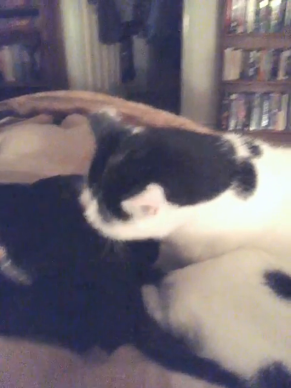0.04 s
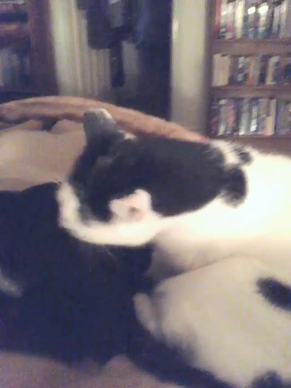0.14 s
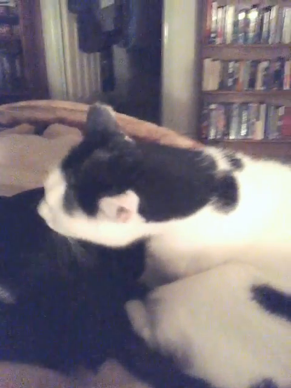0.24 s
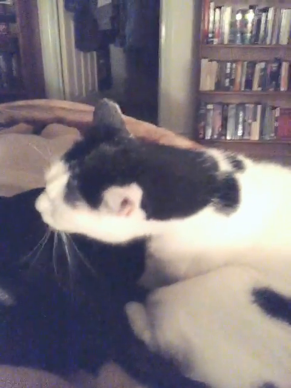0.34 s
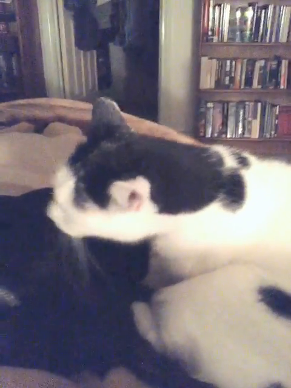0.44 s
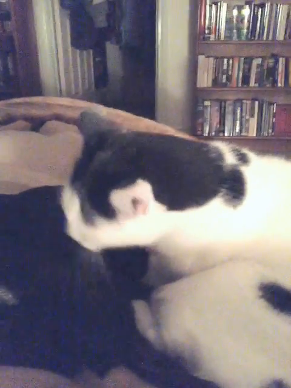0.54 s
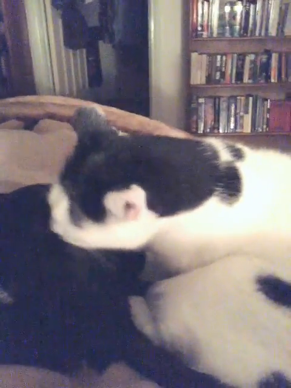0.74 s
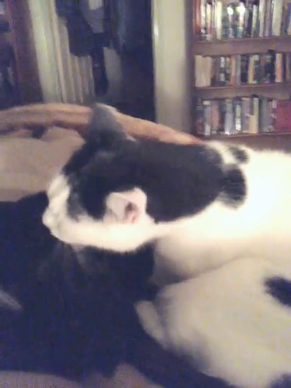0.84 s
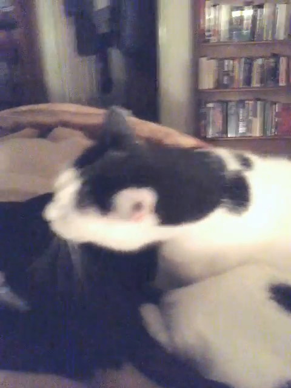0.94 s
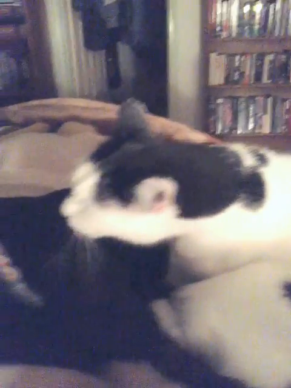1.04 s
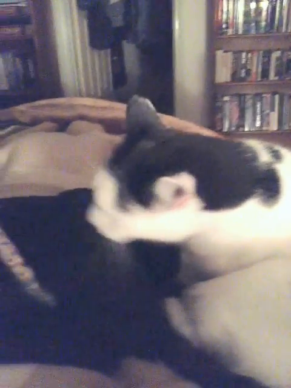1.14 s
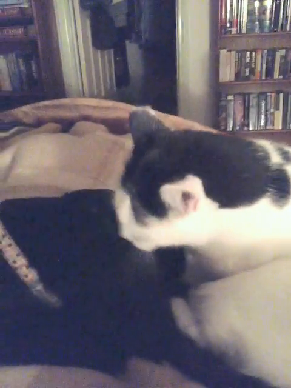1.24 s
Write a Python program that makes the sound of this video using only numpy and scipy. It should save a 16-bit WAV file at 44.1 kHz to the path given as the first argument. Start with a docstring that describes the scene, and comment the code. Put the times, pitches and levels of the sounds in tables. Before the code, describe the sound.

Close handling noise on a hand-held camera in a quiet, echoless room. Soft bumps come first, then dry irregular clicks and a heavier thump, followed by lighter ticks and a last cluster of thuds over faint hiss.

```python
"""Close on a hand-held camera in a quiet, echoless room where one cat grooms another, unheard.
Faint rumble and hiss run throughout. Soft bumps open, then dry ticks join: small pressure steps, most
likely from the grip on the housing, which the microphone's bass cut turns into clicks and low wobbles.
The sharpest tick lands at 0.37 s, the heaviest bump and a tiny creak near 0.44 s. Lighter ticks and
bumps follow, and a last cluster of thuds near 1.2 s trails off in two faint ticks."""
import sys
import numpy as np
from scipy import signal
from scipy.fft import rfft, irfft
from scipy.io import wavfile
from scipy.ndimage import uniform_filter1d

SR = 44100
rng = np.random.default_rng(int(sys.argv[2]) if len(sys.argv) > 2 else 0)


def store_wav(level_fs):
    """Save 16-bit WAV to argv[1]."""
    pcm = np.round(np.clip(np.atleast_2d(level_fs), -1, 1) * 32767)
    wavfile.write(sys.argv[1], SR, pcm.T.astype(np.int16))


N = 57330

# The bed of rumble and hiss, ahead of the microphone.
# Each row: frequency in Hz, level in dB relative to BED_DB.
BED_SHAPE = [(30, 27), (60, 40.5), (120, 17), (200, 13), (350, 6), (700, 3), (1500, 0), (4000, -2.5),
             (8000, -4), (10000, -4.5), (12500, -9.5), (15500, -10.5)]
# Dull pushes of the hand.
# Each row: time in seconds, step size in dB, bandwidth in Hz, direction (+1 push, -1 pull).
HAND_BUMPS = [(0.03, -32.5, 125, 1), (.0653, -29.5, 122, 1), (0.165, -27.5, 100, 1),
              (0.1854, -26.5, 120, 1), (0.1999, -31, 135, -1), (0.4106, -49, 320, 1),
              (0.4436, -25.5, 665, -1), (0.4459, -15, 268, -1), (0.4479, -18, 230, -1),
              (.745, -32, 139, -1), (0.7618, -36, 161, -1), (.775, -31, 125, 1), (.848, -33, 166, -1),
              (0.9311, -48.5, 423, 1), (0.9467, -45, 270, 1), (1.1712, -26.5, 123, 1),
              (1.1961, -22.5, 118, -1), (1.215, -31.5, 140, 1)]
# Sharp slips of the housing.
# Each row: start in seconds, step size in dB, treble corner in Hz, direction (+1 push, -1 pull).
HOUSING_TICKS = [(.23112, -25.5, 2200, 1), (.23182, -22.8, 11000, 1), (.3698, -15.3, 16000, 1),
                 (.4363, -22.7, 15000, 1), (.4881, -24.3, 16000, 1), (.5634, -27.3, 15000, 1),
                 (.6817, -37, 9000, 1), (.8161, -43.5, 900, 1), (.8180, -45, 6000, 1),
                 (.8695, -54, 3500, 1), (1.0158, -31.5, 2800, -1), (1.0583, -54, 5000, -1),
                 (1.0687, -48, 10000, 1), (1.0745, -35.3, 13000, 1), (1.1006, -48, 7000, 1),
                 (1.2444, -48, 8000, 1), (1.2641, -52, 5000, 1)]
# The microphone's two bass-cut stages. Each row: corner in Hz, resonance as Q.
BASS_CUT_STAGES = [(160, 1.554), (266, 0.53)]
# The microphone's colour, with a notch in the treble. Each row: frequency in Hz, gain in dB.
MIC_COLOUR = [(200, 4.5), (1000, -0.18), (3000, -1.56), (6000, -2), (8000, -5), (9800, -11.5), (12000, 0.5),
              (15000, 7), (16500, -8)]

BED_DB, HISS_TOP_HZ, MIC_TOP_HZ = -66, 15900, 16700
CREAK_START_S, CREAK_LENGTH_S, CREAK_HZ, CREAK_DB = .4385, 0.014, 690, -54.5
# Layers are mixed as spectra on these frequencies, at twice the scene's length to leave room for tails.
BINS_HZ = np.maximum(np.arange(N + 1), .5) * SR / (2 * N)


def undb(db):
    """Decibels to gain."""
    return 10 ** (np.asarray(db) / 20)


def eq_curve(points):
    """Gain at each frequency from (Hz, dB) points joined on a log axis."""
    hz, db = np.array(points).T
    return undb(np.interp(np.log(np.maximum(BINS_HZ, 1)), np.log(hz), db))


def rumble_and_hiss():
    """Spectrum of the steady bed: low handling rumble under an even hiss."""
    noise = rfft(rng.standard_normal(2 * N))
    return noise * undb(BED_DB) * eq_curve(BED_SHAPE) * (BINS_HZ < HISS_TOP_HZ)


def pressure_step(time_s, db, direction):
    """Spectrum of a sudden jump in pressure, the raw hit behind every bump and tick."""
    j_omega = 2j * np.pi * BINS_HZ
    delay = np.exp(-j_omega * time_s)
    return np.sign(direction) * undb(db) * SR / j_omega * delay


def hand_bumps():
    """Cushioned pushes: each step is rounded over milliseconds, leaving only a thud."""
    return sum(pressure_step(time_s, db, direction) * np.exp(-(BINS_HZ / bandwidth_hz) ** 2)
               for time_s, db, bandwidth_hz, direction in HAND_BUMPS)


def housing_ticks():
    """Abrupt slips: each step rises within a fraction of a millisecond, so the attack stays crisp."""
    return sum(pressure_step(start_s, db, direction) / (1 + 1j * BINS_HZ / corner_hz) ** 2
               for start_s, db, corner_hz, direction in HOUSING_TICKS)


def grip_creak():
    """The grip slides: about ten cycles of stick and slip, voiced as a tone that swells and stops."""
    t = np.arange(N) / SR - CREAK_START_S
    swell = np.sin(np.pi * np.clip(t / CREAK_LENGTH_S, 0, 1))
    tone = np.sin(2 * np.pi * CREAK_HZ * t)
    return rfft(undb(CREAK_DB) * swell * tone, 2 * N)


def bass_cut():
    """Resonant high-pass: a step swings back and rings for about two cycles."""
    s = 1j * BINS_HZ
    stages = [s * s / (s * s + s * hz / q + hz * hz) for hz, q in BASS_CUT_STAGES]
    return np.prod(stages, axis=0)


def minimum_phase(gain):
    """Turn a gain curve into a filter that never rings ahead of a hit."""
    cepstrum = irfft(np.log(gain))
    half = len(cepstrum) // 2
    cepstrum[1:half] *= 2
    cepstrum[half + 1:] = 0
    return np.exp(rfft(cepstrum))


def scene():
    """Bed, bumps, ticks and creak, mixed in mono through the bass cut."""
    mix = rumble_and_hiss() + hand_bumps() + housing_ticks() + grip_creak()
    return irfft(mix * bass_cut())[None, :N]


def record(dry):
    """Microphone colour, then a steep cut at the top."""
    colour = minimum_phase(eq_curve(MIC_COLOUR))
    coloured = irfft(rfft(dry, 2 * N) * colour)[:, :N]
    top_cut = signal.ellip(10, .2, 70, MIC_TOP_HZ, fs=SR, output="sos")
    return signal.sosfilt(top_cut, coloured)


dry = scene()
out = record(dry)
store_wav(out)
```